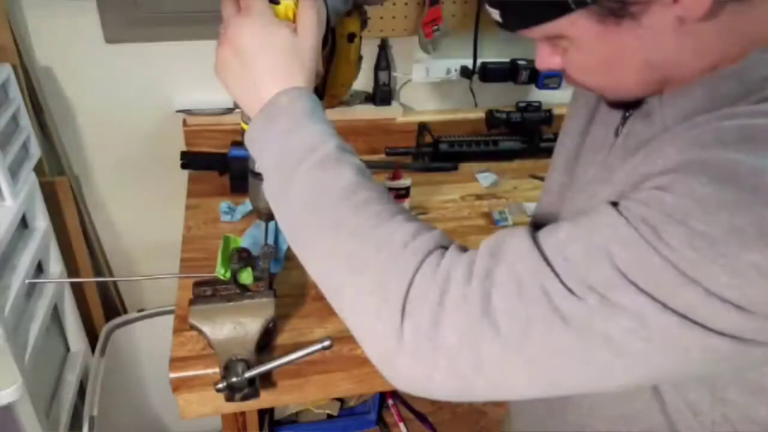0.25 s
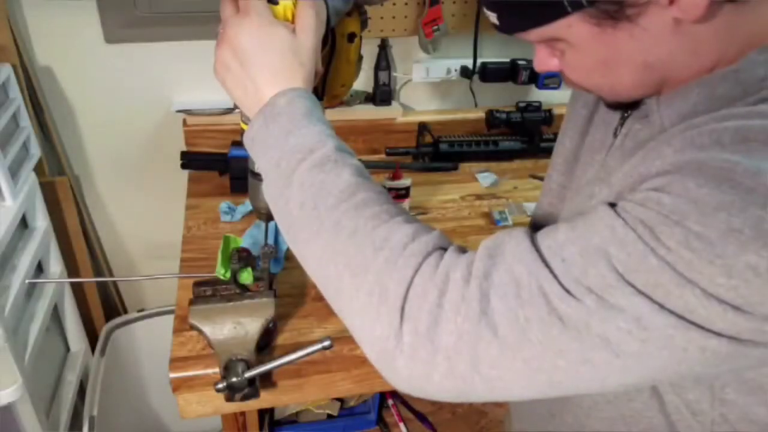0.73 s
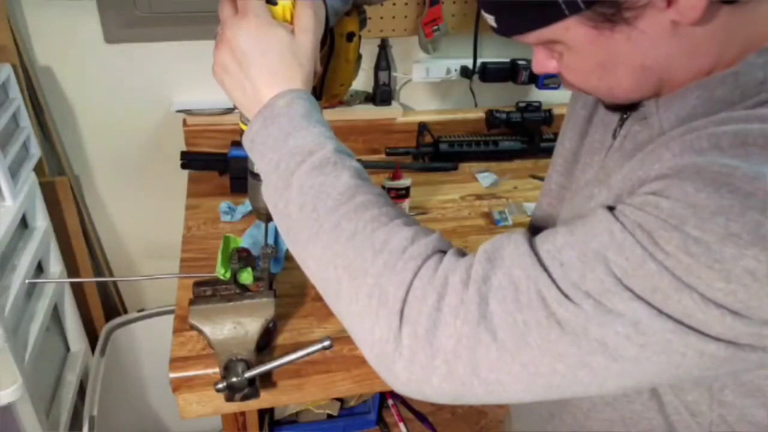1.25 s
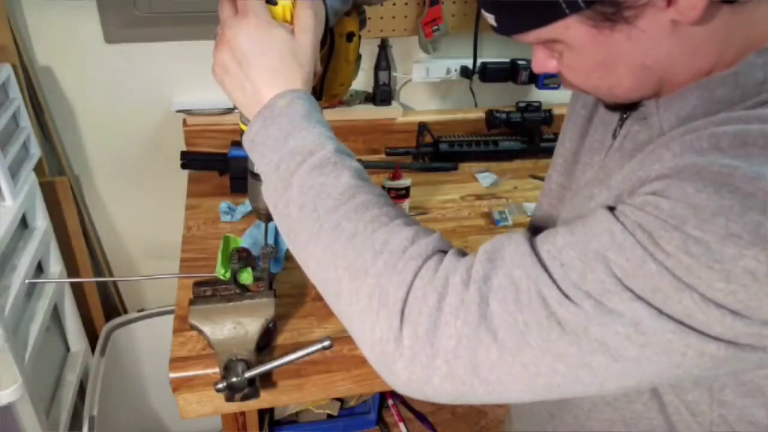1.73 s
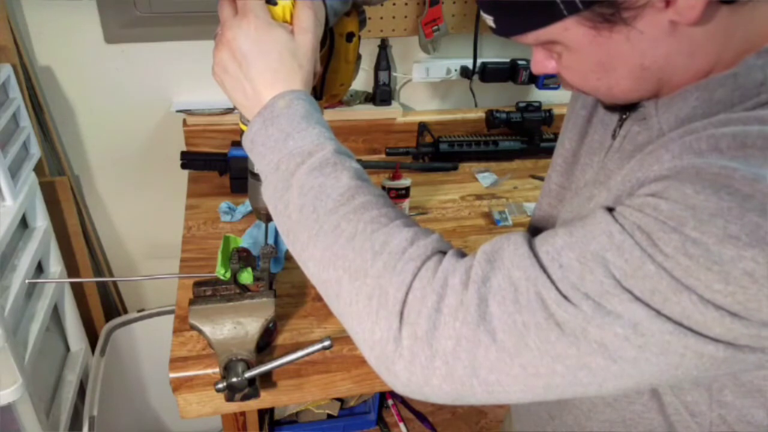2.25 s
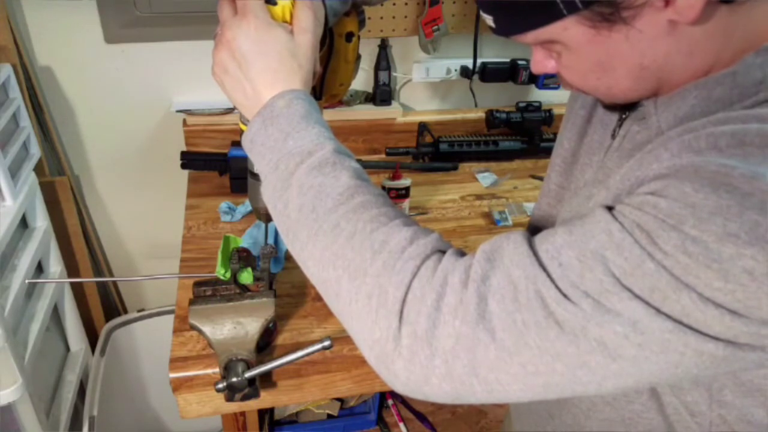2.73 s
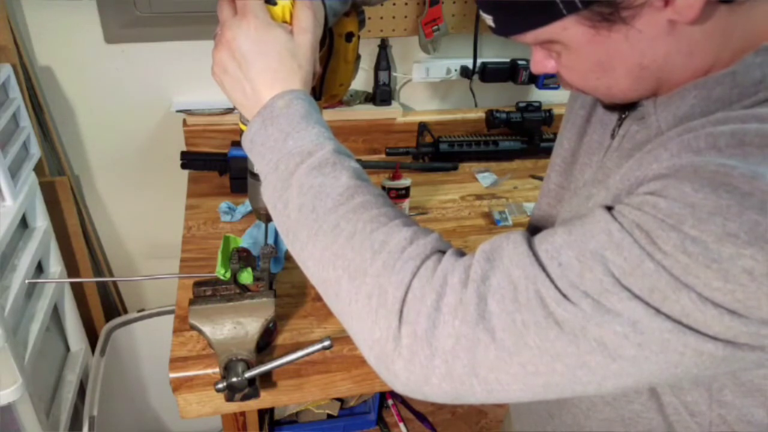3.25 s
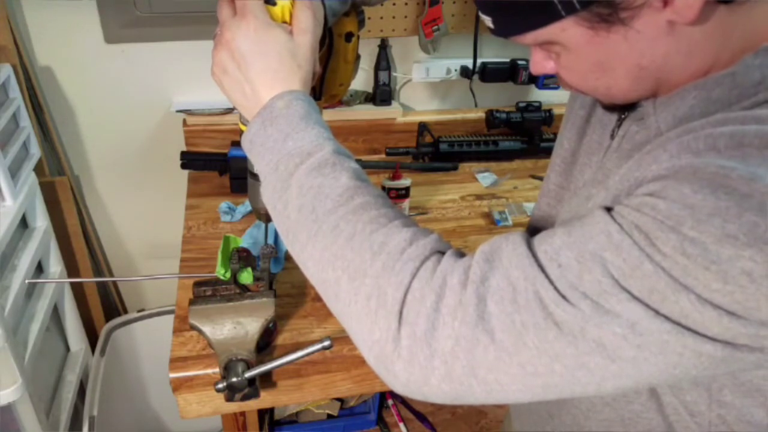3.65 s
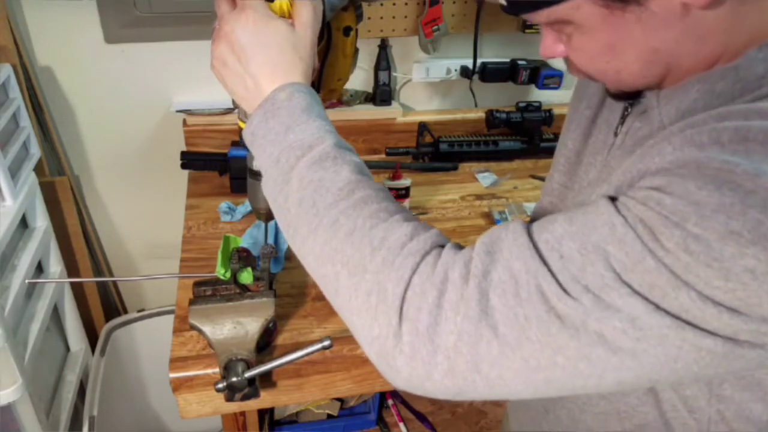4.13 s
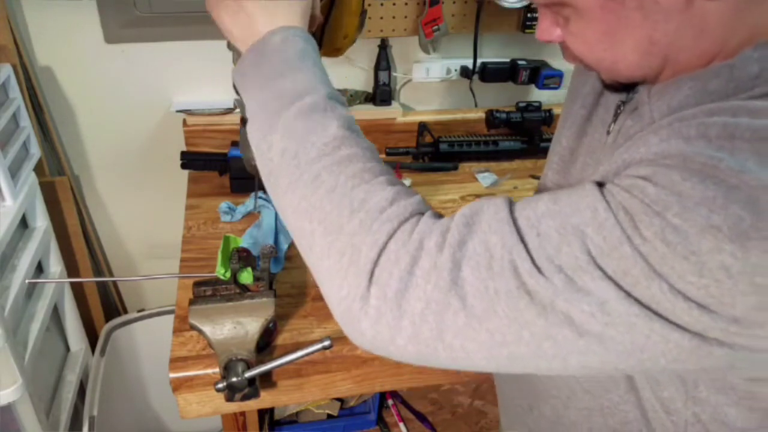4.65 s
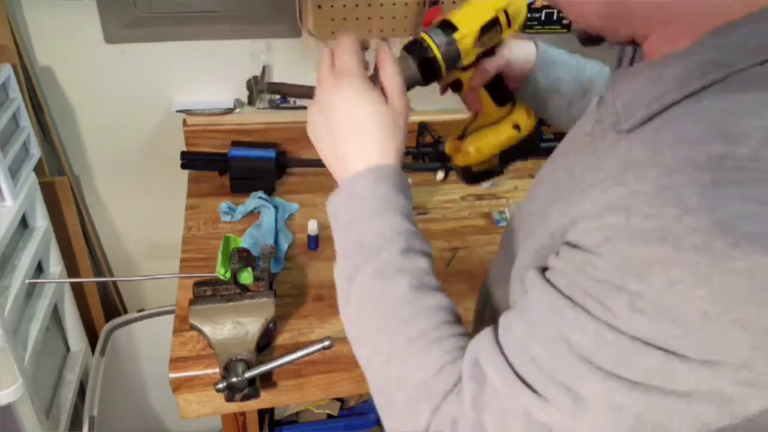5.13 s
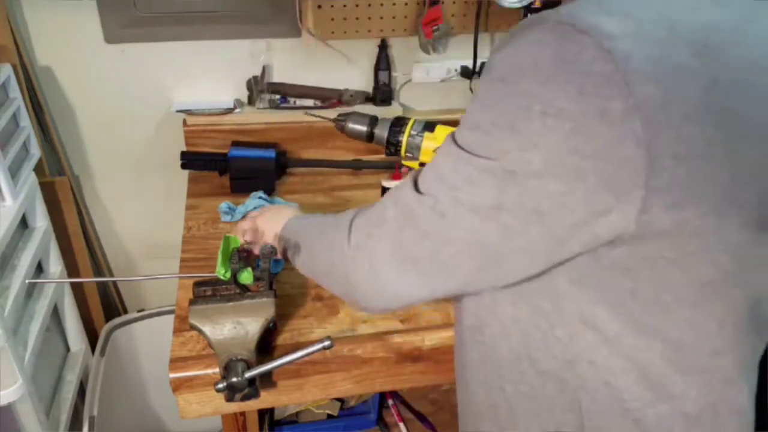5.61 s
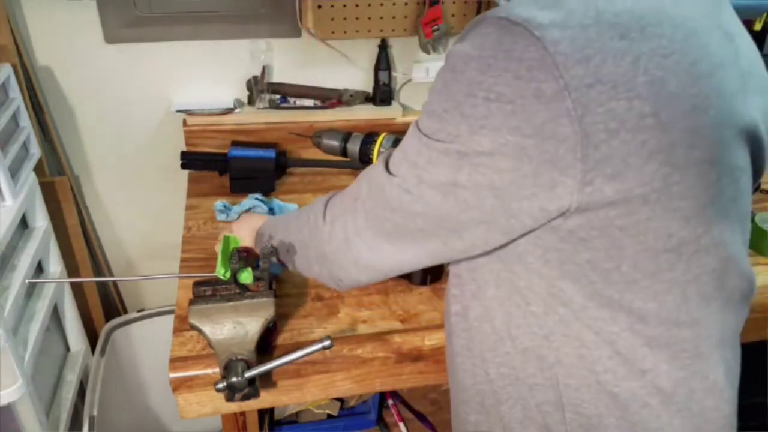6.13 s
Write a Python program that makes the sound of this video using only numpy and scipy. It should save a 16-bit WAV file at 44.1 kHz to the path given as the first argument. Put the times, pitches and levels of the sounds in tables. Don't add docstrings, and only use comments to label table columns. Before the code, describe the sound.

A cordless drill bores metal, whistling fast, bogging with a groan, then squealing steadily until it pulls free, blips once and is set down.

```python
import sys
import numpy as np
from scipy import signal
from scipy.fft import rfft, irfft, next_fast_len
from scipy.io import wavfile
from scipy.ndimage import uniform_filter1d

SR = 44100
rng = np.random.default_rng(int(sys.argv[2]) if len(sys.argv) > 2 else 0)


def volts_from_db(level):
    exponent = np.asarray(level, float) / 20
    return 10 ** exponent


def generate_wav(signal):
    frames = np.transpose(np.atleast_2d(signal))
    scaled = np.clip(frames, -1, 1) * 32767
    pcm = np.round(scaled).astype(np.int16)
    wavfile.write(sys.argv[1], SR, pcm)


N = 280917
FAST = next_fast_len(N, True)
T = np.arange(N) / SR
HZ = np.maximum(np.arange(FAST // 2 + 1) * SR / FAST, 1.)

# time in seconds, turns per second in Hz.
SPEED = [(1.15, 215.3), (1.23, 205), (1.4, 137), (1.5, 111), (1.6, 97), (1.7, 101), (2.1, 142), (2.25, 147),
         (2.6, 148.3), (2.9, 147.8), (3.5, 146), (4.0, 146.7), (4.45, 146), (4.76, 159), (4.83, 170),
         (5.0, 60), (5.1, 165), (5.2, 202), (5.25, 203), (5.31, 150)]
BIT_OUT_S, LIFT_S = 4.66, 0.068


def unit(x):
    return x / np.sqrt(np.mean(x ** 2))


def curve(rows):
    s, *columns = np.transpose(rows)
    return [np.interp(T, s, c) for c in columns]


def shape(points):
    f, v = np.transpose(points)
    return np.interp(np.log(HZ), np.log(f), v)


def colour(x, gain):
    return irfft(rfft(x, FAST) * gain, FAST)[..., :N]


def peak(hz, width):
    return 1 / np.sqrt(1 + ((HZ - hz * hz / HZ) / width) ** 2)


def walk(rate):
    k = int(SR / rate)
    steps = np.repeat(rng.standard_normal(N // k + 1), k)
    return 1.47 * uniform_filter1d(uniform_filter1d(steps, k), k)[:N]


def tone(hz, wobble_db, rate, drift):
    phase = 2 * np.pi * np.cumsum(hz * np.ones(N)) / SR + drift * walk(rate)
    return np.sqrt(2) * volts_from_db(wobble_db * walk(rate)) * np.sin(phase)


def flicker(x, gain, flicker_db, rate, step=.5):
    spectrum, out = rfft(x, FAST) * gain, 0
    audible = np.abs(gain) > np.abs(gain).max() / 1000
    low, high = np.log2(HZ[audible][[0, -1]])
    for centre in np.arange(max(5, low // step * step), high + step, step):
        offset = (np.log2(HZ) - centre) / (2 * step)
        band = np.cos(np.pi * np.clip(offset, -.5, .5)) ** 2
        out = out + volts_from_db(flicker_db * walk(rate)) * irfft(spectrum * band, FAST)[:N]
    return unit(out)


def swells(rows):
    return sum(volts_from_db(db) * np.exp(-(2 * (T - s) / length) ** 2) for s, length, db in rows)


def after(s, length):
    return np.clip((T - s) / length, 0, 1)


def gear_noise(speed, gears_hz):
    # frequency in Hz, level in dB per Hz.
    body_points = [(240, -76), (400, -11.5), (680, -4), (723, -7.5), (804, -7), (907, 0), (1250, -7),
                   (1500, -3.5), (2250, -3), (2420, -6), (3610, -8), (4600, -3), (6820, -13), (7930, -26.5),
                   (11400, -16.5), (13900, -14.5), (15000, -31)]
    # frequency in Hz, width in Hz, level in dB.
    housing = [(1060, 22, -6), (4930, 1100, -13.5), (5670, 520, -4)]
    # frequency in Hz, width in Hz, level in dB.
    chuck_modes = [(1976, 42, 3), (2030, 35, -2), (2200, 38, 2)]
    free = after(BIT_OUT_S, LIFT_S)

    turn = 2 * np.pi * np.cumsum(speed) / SR
    teeth = rng.standard_normal(N) * (1 + 0.04 * np.cos(turn)) * volts_from_db(0.27 * walk(300))
    body = volts_from_db(shape(body_points)) * (1 + sum(volts_from_db(db) * peak(f, w) for f, w, db in housing))
    split = 1 / (1 + (HZ / 7200) ** 12)
    rattle = flicker(teeth, body * split, flicker_db=1.1, rate=24, step=.25)

    hiss_db = np.interp(speed, gears_hz, (-11, -8, -5.5)) + 0.81 * walk(9)
    hiss_db = hiss_db - 2.5 * after(4.85, .1)
    hiss_db = hiss_db - 14 * free * np.clip(1 - (speed - 60) / 60, 0, 1)
    hiss = volts_from_db(hiss_db) * flicker(teeth, body * (1 - split), flicker_db=0.53, rate=20)

    held_db, free_db, wander_db = -8.5, 1.5, 1.2
    chuck_db = held_db + (free_db - held_db) * (free - after(5.22, 0.051))
    chuck_db = chuck_db + wander_db * (1 - 0.37 * free) * walk(16)
    ring = unit(colour(teeth, sum(volts_from_db(db) * peak(f, w) for f, w, db in chuck_modes)))
    return rattle + hiss + volts_from_db(chuck_db - 11.0) * ring


def motor_tones(speed, gears_hz):
    orders = (1, 3, 4, 5, 6, 6.25, 7.06, 9, 9.41, 10, 11.25, 12.2, 13.2, 15.26, 22.43, 3.13, 8.19, 10.27,
               10.55, 14.2, 23.4, 18.42)
    # dB bogged down, dB loaded, dB fast.
    order_levels = [(-65, -60, -58), (-62, -60, -44.5), (-68, -64, -54), (-43, -44, -49.5), (-68, -58, -48),
                    (-52, -45, -62), (-66, -52, -64), (-70, -62, -47), (-68, -51, -64), (-70, -66, -44),
                    (-52, -46.5, -58), (-62, -42, -60), (-62, -43, -56), (-62, -49, -62), (-56, -45.5, -70),
                    (-62, -55, -50), (-64, -54, -49), (-66, -62, -46), (-66, -62, -51), (-64, -52, -64),
                    (-70, -51, -70), (-70, -54, -70)]
    fade_hz_per_s = 1500
    change = uniform_filter1d(np.gradient(speed) * SR, SR // 20)
    steady = 1 / (1 + np.abs(change) / fade_hz_per_s)
    tones = 0
    for k, db in zip(orders, order_levels):
        line = tone(k * speed, 1.6, rate=6 + 2.5 * min(k, 13), drift=.7)
        tones = tones + volts_from_db(np.interp(speed, gears_hz, db)) * line
    return tones * steady * (T < 5.36)


def work_rumble():
    # frequency in Hz, level in dB per Hz.
    rumble_points = [(20, -22), (60, -11), (130, -3), (220, 0), (300, -9), (400, 0), (520, -18),
                     (1100, -58)]
    level_db = -49 + 6 * np.clip(walk(18), -4, 1) - 6.5 * after(4.82, .05) - 19 * after(5.3, 0.085)
    return volts_from_db(level_db) * flicker(rng.standard_normal(N), volts_from_db(shape(rumble_points)), flicker_db=3, rate=16)


def drill():
    # time in seconds, level in dB.
    boring = [(0.2, -31.5), (0.71, -26.5), (0.86, -32), (1.04, -28), (1.27, -26), (1.42, -30), (1.6, -33.5),
              (1.75, -29), (2.29, -33), (2.55, -28.5), (3.35, -31.5), (3.9, -29), (4.25, -31.5), (4.4, -28),
              (4.83, -30.5), (4.882, -38), (4.915, -57), (4.99, -59)]
    # time in seconds, level in dB.
    blip = [(5.011, -43), (5.014, -44), (5.064, -34), (5.215, -32.5), (5.235, -26.5), (5.26, -24),
            (5.296, -31.5), (5.324, -48.5), (5.44, -64.5)]
    gears_hz = (105, 146, 208)
    speed, = curve(SPEED)
    level_db = curve([*boring, *blip])[0] + 0.84 * walk(21.88)
    noise = volts_from_db(level_db - 3.0) * gear_noise(speed, gears_hz) + work_rumble()
    return noise, volts_from_db(level_db + 31.5) * motor_tones(speed, gears_hz)


def bit_squeal():
    # time in seconds, pitch in Hz.
    squeal_pitch = [(1.5, 4570), (1.86, 4600), (1.92, 4290), (1.99, 4490), (2.5, 4530), (4.4, 4514),
                    (4.55, 4465), (4.72, 4458), (4.735, 4310)]
    # time in seconds, length in seconds, level in dB.
    bites = [(1.95, 0.053, -41), (2.2, 0.28, -31.5), (2.55, .1, -38), (2.8, .2, -38), (3.1, 0.16, -31),
             (3.4, 0.21, -29), (3.9, 0.25, -30), (4.48, 0.31, -32), (4.64, 0.1, -38), (4.73, 0.066, -35)]
    start_s, end_s = 1.61, 4.78
    hz, = curve(squeal_pitch)
    cutting = after(start_s - .08, 0.073) * (1 - after(end_s - .04, 0.039))
    return cutting * (volts_from_db(-37.5) + swells(bites)) * tone(hz, 1.7, rate=25, drift=0.66)


def whistles():
    # time in seconds, pitch in Hz.
    upper_pitch = [(.1, 5668), (.42, 5668), (.56, 5610), (.66, 5645), (.72, 5615), (.77, 5655), (.84, 5590),
                   (.9, 5620), (1.05, 5635)]
    # time in seconds, length in seconds, level in dB.
    lower_swells = [(.13, .16, -34.5), (.37, .13, -36), (.66, .2, -36), (1.0, .1, -43), (1.1, .08, -39)]
    # time in seconds, length in seconds, level in dB.
    upper_swells = [(.13, .17, -32.5), (.32, .18, -34.5), (.6, .1, -39), (.74, .12, -35), (.88, .09, -36),
                    (1.05, .05, -39)]
    upper_hz, = curve(upper_pitch)
    between = volts_from_db(-49) * (T < 1.15)
    lower = (swells(lower_swells) + between) * tone(5043, 4.1, rate=33, drift=0.85)
    upper = (swells(upper_swells) + between) * tone(upper_hz, 4.1, rate=33, drift=0.85)
    return lower + upper


def groan():
    hz = 1087
    voice = tone(hz, 2, rate=20, drift=0.87) + tone(2 * hz, 2.3, rate=37, drift=.8)
    return swells([(1.643, 0.27, -37.5)]) * voice


def spin_up():
    start_s, rise_hz_per_s = 5.14, 500
    voices = sum(tone(f + rise_hz_per_s * (T - start_s), 2.5, rate=30, drift=.7) for f in (1955, 2070, 2180))
    return swells([(start_s, .16, -37)]) * voices


def brakes():
    # time in seconds, length in seconds, level in dB, pitch in Hz, glide in Hz per second.
    glides = [
        (4.845, .06, -34, 545, -2600),
        (5.275, .045, -37, 500, -2400),
        (5.07, .07, -42, 450, 900),
    ]
    out = 0
    for s, length, db, hz, slope in glides:
        glide_hz = np.clip(hz + slope * (T - s), 100, 900)
        out = out + swells([(s, length, db)]) * tone(glide_hz, 1.0, rate=30, drift=0.25)
    return out


def bench():
    # time in seconds, pitch in Hz, level in dB.
    low_mode = [(1.0, 90, -65), (1.7, 90, -53), (2.48, 92, -62), (2.6, 92, -44), (3.3, 91, -41),
                (3.5, 89, -61), (3.63, 89.2, -40.5), (4.1, 89.6, -32.5), (4.3, 91, -32.5), (5.3, 91, -55.5),
                (5.72, 90.5, -47.5), (6.0, 83, -53)]
    # time in seconds, length in seconds, level in dB.
    jolts = [
        (.42, 0.18, -45.5),
        (.64, 0.065, -50),
        (1.04, 0.077, -43),
        (1.75, .14, -50),
        (4.83, 0.11, -43),
        (5.13, 0.14, -54),
    ]
    shake_hz, width_hz, shake_db, grows_db_per_s = 140, 16, -32, 0.9
    speed, = curve(SPEED)
    tuned = np.exp(-((speed - shake_hz) / width_hz) ** 2)
    tuned = tuned * (1 - after(BIT_OUT_S - LIFT_S, LIFT_S))
    loose = unit(colour(rng.standard_normal(N), peak(134.0, 36) ** 2))
    shake = tone(speed, 1.8, rate=18, drift=0.2) + 0.21 * loose
    boom = volts_from_db(shake_db + grows_db_per_s * (T - 4.0)) * tuned * shake
    loose_gain = volts_from_db(-56.5 + 3.0 * walk(5.7)) * (T < 5.33) + swells(jolts)
    mode_hz, mode_db = curve(low_mode)
    creak_db = 3.5 * np.clip(walk(12.0), -3, 1) * (1 - after(2.4, .2))
    drone = tone(uniform_filter1d(mode_hz, SR // 4), 1.0, rate=10, drift=0.29)
    return boom + loose_gain * loose + volts_from_db(mode_db + creak_db - 1.0) * drone


def knocks():
    # time in seconds, peak in dB, ring in Hz, sharpness in dB, t60 in seconds.
    blows = [
        (4.813, -37, 1060, -14, 0.036),
        (4.822, -23, 600, -10, 0.074),
        (5.013, -26.5, 700, -24, 0.04),
        (5.242, -23, 610, -8, 0.053),
        (5.255, -21, 900, -4.5, 0.058),
        (5.5704, -28, 760, -10, 0.035),
        (6.177, -32, 650, -40, 0.042),
    ]
    # ratio to the ring, level in dB, share of the t60.
    modes = [(1, 0, 1), (1.75, -2, 0.74), (2.9, -8, .4)]
    out, t = np.zeros(N), T[:SR // 6]
    for s, db, hz, sharp_db, t60 in blows:
        ring = 0
        for ratio, mode_db, share in modes:
            ring = ring + volts_from_db(mode_db) * np.sin(2 * np.pi * hz * ratio * t) * 1000. ** (-t / (t60 * share))
        grit = rng.standard_normal(len(t))
        crack = signal.lfilter([1, -.3], [1], grit) * 1000. ** (-t / 0.028)
        rattle = signal.lfilter([.5], [1, -.5], grit) * 1000. ** (-t / 0.23)
        i = int(s * SR)
        out[i:i + len(t)] += volts_from_db(db - 4.5) * (ring + volts_from_db(sharp_db + 13.0) * (crack + volts_from_db(-8.5) * rattle))
    return out + chuck_tick()


def chuck_tick():
    start_s, level_db, hz, t60_s = 5.5704, -33, 3950, .02
    age = np.maximum(T - start_s, 0)
    return volts_from_db(level_db) * np.sin(2 * np.pi * hz * age) * 1000. ** (-age / t60_s)


def scuffs():
    # start in seconds, length in seconds, level in dB, centre in Hz, width in Hz.
    strokes = [
        (5.238, .04, -32.5, 1900, 400),
        (5.58, .06, -57, 1300, 300),
        (5.693, 0.063, -62, 650, 300),
        (5.845, 0.08, -62, 1450, 700),
        (6.17, 0.04, -46, 610, 303),
        (6.188, 0.086, -50, 740, 600),
        (6.177, 0.06, -53, 1450, 650),
        (6.274, 0.091, -61, 745, 350),
    ]
    out = 0
    for s, length, db, hz, width in strokes:
        grains = rng.standard_normal(N) * volts_from_db(2.0 * walk(150))
        age = (T - s) / length
        fade = np.clip(age * 12, 0, 1) * np.clip(1.9 * (1 - age), 0, 1)
        out = out + volts_from_db(db) * fade * unit(colour(grains, peak(hz, 1.2 * width) ** 4))
    return out


def shop():
    # frequency in Hz, level in dB per Hz.
    floor_points = [(15, -44), (25, -8), (86, -4.5), (109, -1), (191, 1), (278, -35), (373, -3.5),
                    (501, -16.5), (903, -20.5), (978, -20.5), (7480, -45), (13800, -51), (15000, -59)]
    # frequency in Hz, width in Hz, level in dB.
    hum_lines = [(187.6, 9, -54), (376.5, 6, -49.5)]
    floor = volts_from_db(-46) * flicker(rng.standard_normal(N), volts_from_db(shape(floor_points)), flicker_db=1.2, rate=9)
    hum = sum(volts_from_db(db) * tone(f, 0.81, rate=w, drift=0.89) for f, w, db in hum_lines)
    duck_db, = curve([(0, -2), (1.8, -7), (2.6, -2), (4.8, -7.5), (5.3, -5.5)])
    return volts_from_db(duck_db) * floor, volts_from_db(duck_db) * hum


def echoes(t60):
    tail = rng.standard_normal((2, N)) * 1000. ** (-T / t60) * (T > .004)
    return rfft(tail / np.sqrt(np.sum(tail ** 2, axis=1, keepdims=True)), FAST)


def scatter(x):
    frames = signal.stft(x, nperseg=512, noverlap=384)[2]
    turned = frames * np.exp(2j * np.pi * rng.random((2,) + frames.shape))
    return 2 * signal.istft(turned, nperseg=512, noverlap=384)[1][:, :N]


def scene():
    # frequency in Hz, level in dB.
    diffuse = [(30, -5), (60, 0), (150, -5.5), (300, 3), (1000, -0.5), (3000, 0.5), (6000, 2), (9000, 3.5),
               (12000, 5)]
    # frequency in Hz, left minus right in dB.
    port_balance = [(60, -4), (110, -2), (200, -0.5), (380, -0.5), (700, -3.5), (1290, 3), (2380, -3),
                    (4400, 2), (8120, 7.5), (15000, -6)]
    # time in seconds, left minus right in dB.
    lean = [(.25, 2.1), (.8, 1), (1.75, 0), (2.25, -0.1), (3.25, -0.5), (4.25, -0.3), (4.9, 0.5), (5.7, 0)]
    rattle, tones = drill()
    floor, hum = shop()
    noise = rattle + floor + scuffs()
    sing = bit_squeal() + whistles() + groan() + spin_up() + brakes()
    low = tones + volts_from_db(1.5) * (hum + bench())

    side = np.array([[1], [-1]])
    lead = np.exp(1j * side * np.pi * HZ / SR)
    late = volts_from_db(-5 + 0.33 * shape(diffuse)) * echoes(0.41) / np.sqrt(1 + (HZ / 4000) ** 2)
    heard = colour(noise, lead ** 4.17 + late)
    heard = heard + colour(knocks(), volts_from_db(-2.0) * (lead ** 2 + late))
    heard = heard + colour(low, lead ** 4.0 + .45 * late)
    heard = heard + colour(sing, volts_from_db(-5) * (lead ** 2 + .3 * late))
    heard = heard + colour(scatter(noise), volts_from_db(shape(diffuse)))
    ports = colour(heard, volts_from_db(side * shape(port_balance) / 2 - 2.5))
    return ports * volts_from_db(side * curve(lean)[0] / 2)


def without(x, low_hz, high_hz, when):
    steep = max(16, 16 / np.log(high_hz / low_hz))
    above = 1 + np.tanh(steep * np.log(HZ / low_hz))
    below = 1 + np.tanh(steep * np.log(high_hz / HZ))
    return x - colour(x, above * below / 4) * np.clip(when, 0, 1)


def band_limit(x):
    return signal.sosfilt(signal.butter(12, 15790, fs=SR, output="sos"), x)


def record(dry):
    # time in seconds, gain in dB.
    dropout = [(0, 1.5), (.012, -11.5), (.036, -35), (.056, -67), (.0615, -38), (.0655, -20), (.0665, 2.5)]
    # centre in seconds, length in seconds, from Hz, to Hz.
    low_gaps = [(0.194, 0.089, 20, 570), (0.277, 0.012, 20, 2110), (0.35, 0.0088, 20, 900),
                (0.392, .012, 20, 520), (0.16, 0.032, 1250, 1590), (0.228, .03, 1300, 1720),
                (0.434, 0.019, 680, 1000), (0.553, 0.013, 670, 1810), (.545, .035, 320, 520),
                (0.656, 0.016, 300, 520), (0.747, 0.011, 20, 420), (0.785, 0.084, 740, 950),
                (0.839, .018, 20, 706), (.885, 0.016, 20, 600), (.89, 0.037, 670, 950),
                (0.942, 0.054, 650, 940), (.89, 0.033, 1440, 1880), (0.963, 0.035, 1420, 1710),
                (.975, .045, 250, 520), (1.042, 0.01, 20, 400), (1.315, 0.056, 1270, 1450),
                (1.854, 0.058, 690, 850), (1.94, .1, 8400, 9600), (2.297, .08, 8400, 10200),
                (.21, 0.16, 730, 835), (1.966, 0.042, 490, 570), (2.044, 0.058, 410, 577),
                (0.598, 0.014, 20, 610), (0.442, 0.14, 304, 520), (0.717, 0.059, 250, 550),
                (0.857, 0.086, 20, 209), (0.955, 0.058, 20, 160), (1.14, 0.052, 20, 160),
                (1.627, 0.079, 20, 318), (1.974, 0.19, 175, 316), (2.337, 0.13, 240, 520),
                (3.867, 0.086, 190, 430), (4.82, .04, 200, 340), (1.45, .15, 215, 300), (4.3, .3, 200, 270),
                (2.25, .3, 20, 60), (.5, .2, 20, 70), (5.246, 0.054, 20, 327)]
    # centre in seconds, length in seconds.
    high_gaps = [(1.42, .18), (1.67, .12), (1.94, .18), (2.35, .2), (2.92, .3), (3.16, .1), (3.65, .28),
                 (4.2, .15), (4.62, .07), (4.75, .06), (5.08, .06), (5.52, .08), (5.68, .24), (5.92, .2),
                 (6.2, .3)]
    # from Hz, to Hz, rarity in spreads.
    holes = [(15, 70, .5), (230, 330, .6), (330, 420, .5), (420, 540, .5), (760, 860, 1.0),
             (1150, 1300, 1.4), (1350, 1550, 1.3), (1600, 1750, 1.5), (2450, 2700, 1.4), (2750, 3000, 1.3),
             (3100, 3300, 1.3), (3400, 3700, 1.1), (3900, 4200, 1.6), (7600, 8250, .7), (8250, 8800, .7),
             (8800, 9300, .9), (9300, 9800, .9), (9800, 10300, .7)]
    gaps = [*low_gaps, *((s, length, 7600, 8400) for s, length in high_gaps)]
    for s, length, low_hz, high_hz in gaps:
        dry = without(dry, low_hz, high_hz, 1.8 - 2.4 * np.abs(T - s) / length)
    for low_hz, high_hz, rarity in holes:
        sooner = .1 * (T < 1.25) * (high_hz < 1800)
        dry = without(dry, low_hz, high_hz, 6 * (walk(36) - rarity + sooner) * (T < 4.8))
    gate_db, = curve(dropout)
    top_cut = signal.ellip(14, .2, 70, 14700, fs=SR, output="sos")
    return band_limit(signal.sosfilt(top_cut, dry * volts_from_db(gate_db)))


dry = scene()
out = record(dry)
generate_wav(out)
```